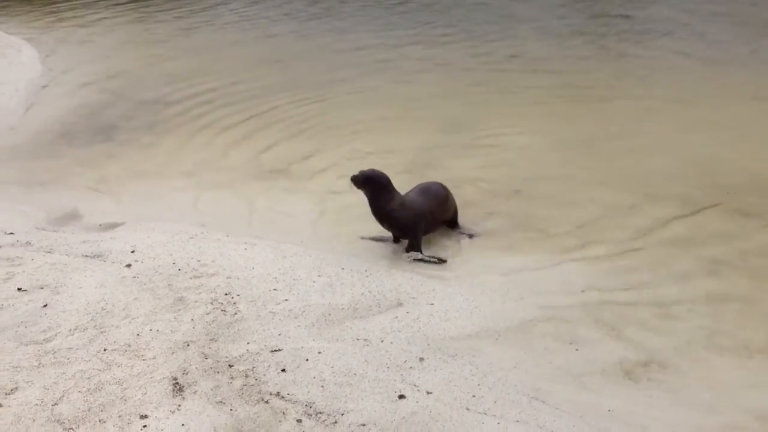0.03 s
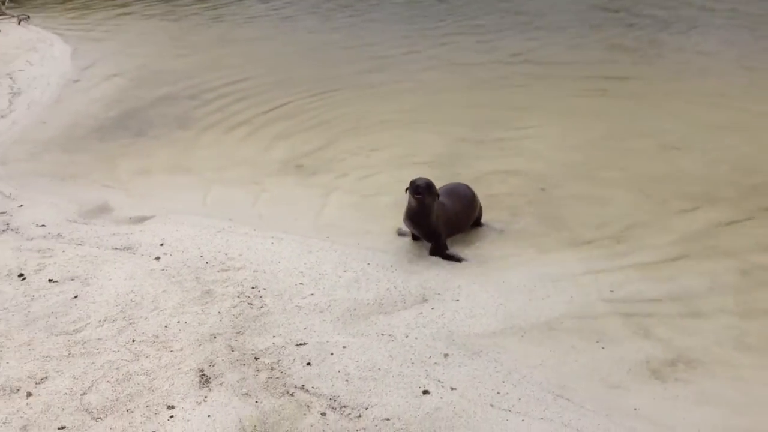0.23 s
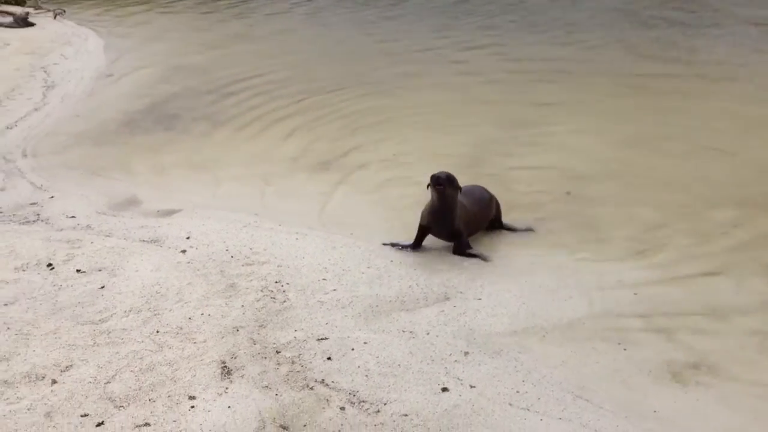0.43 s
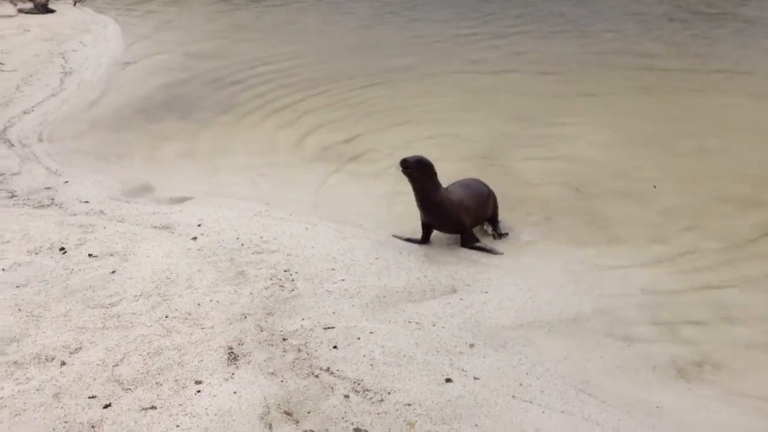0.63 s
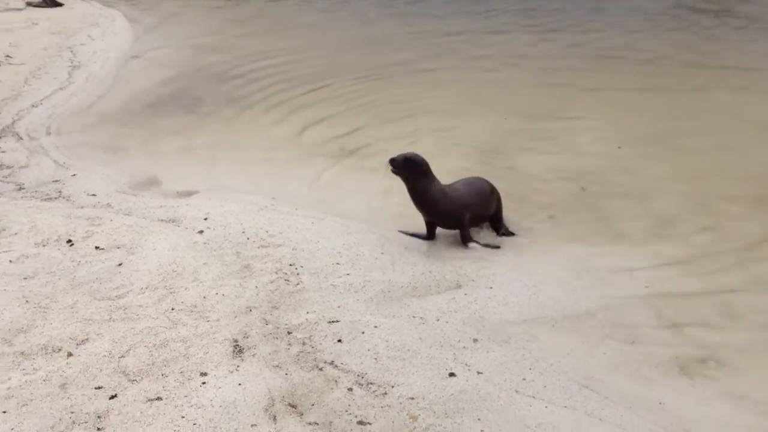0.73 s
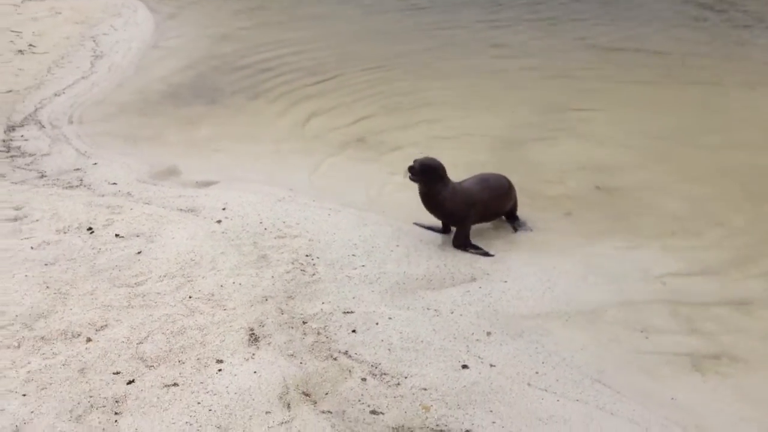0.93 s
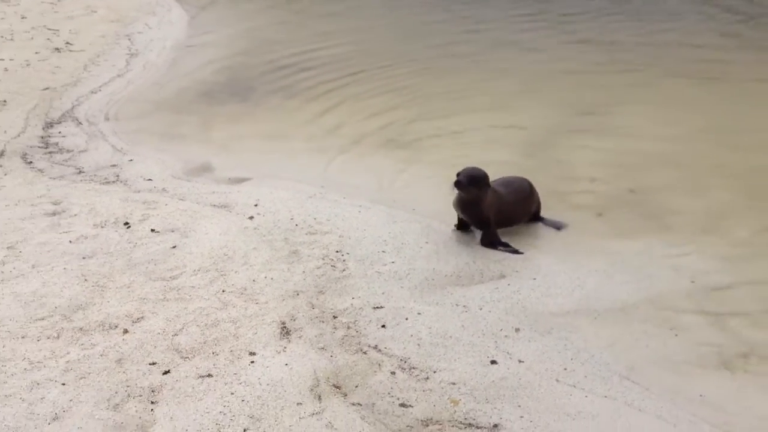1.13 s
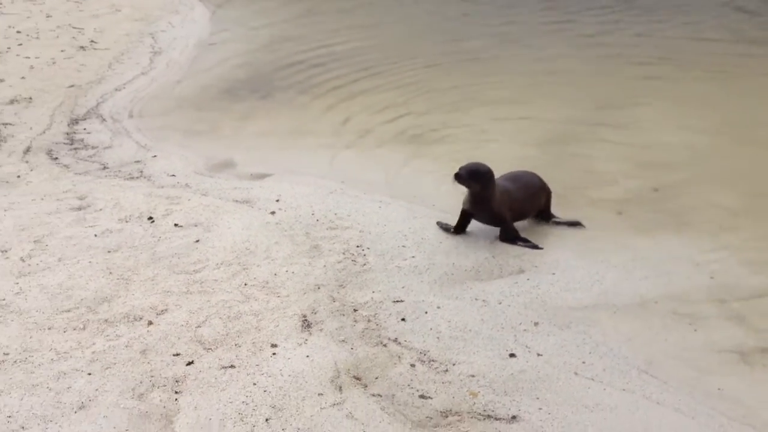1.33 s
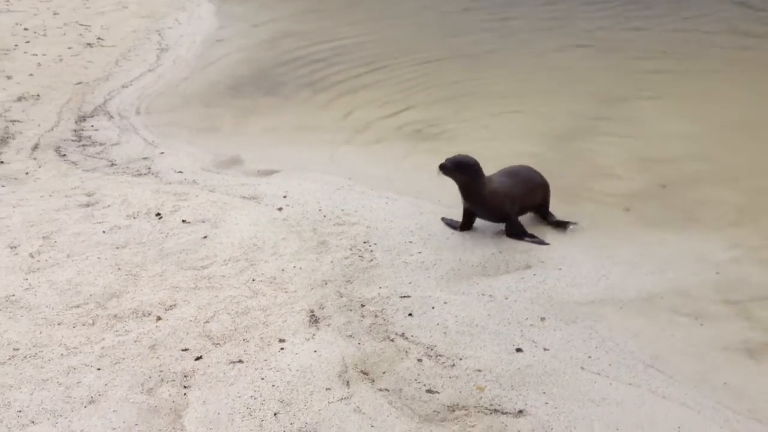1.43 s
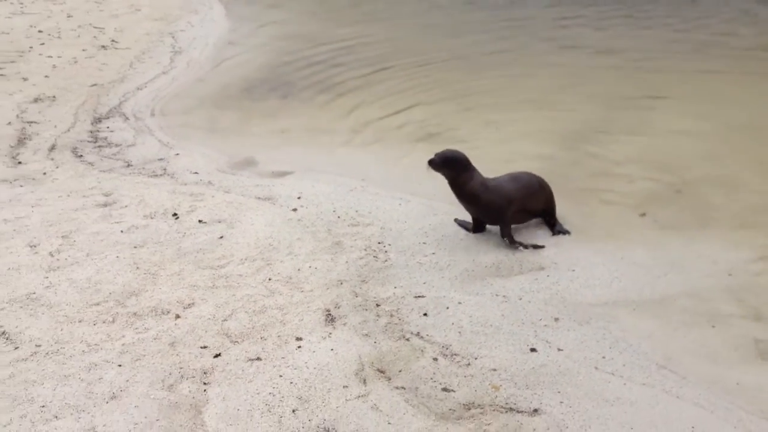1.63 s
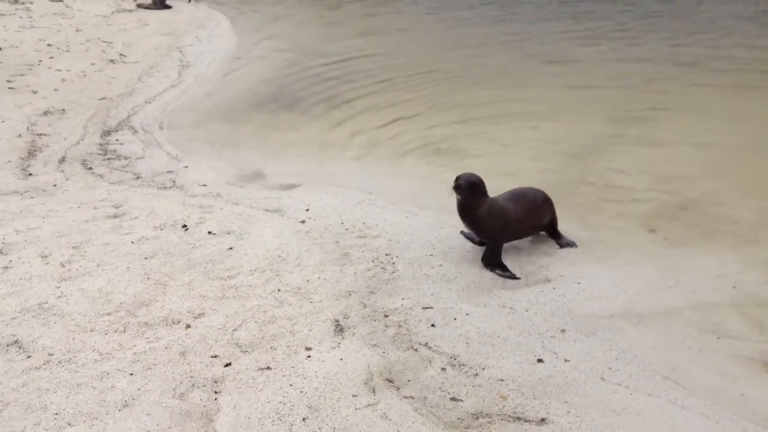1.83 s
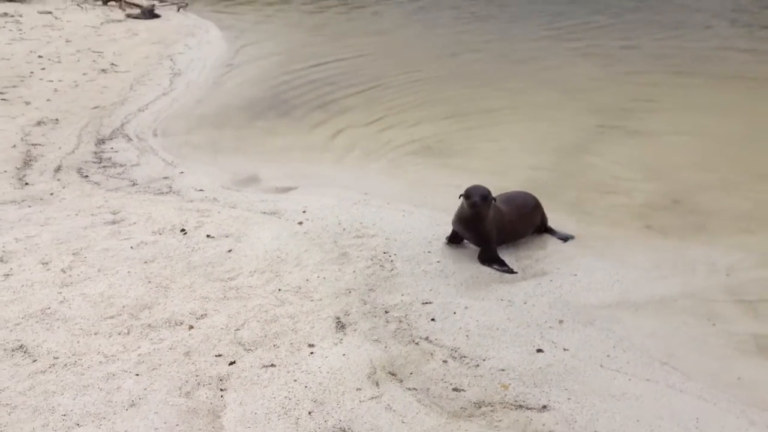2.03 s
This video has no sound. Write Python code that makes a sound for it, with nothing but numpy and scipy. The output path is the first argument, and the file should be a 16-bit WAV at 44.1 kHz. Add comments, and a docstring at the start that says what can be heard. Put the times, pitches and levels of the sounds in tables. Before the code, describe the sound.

A sea lion pup gives one harsh, raspy bleat at the edge of calm shallow water

```python
"""At the edge of a calm beach, close to a sea lion pup, one bleat is heard: a clean buzz that breaks into a rasp,
joined by a high tone that slides down at the end, with a short squeak at the start and a soft low moan under it.
Pulses and puffs of breath pass a moving throat of resonances; squeak, moan and part of the high tone are sines.
Surf rumbles far off and shallow water washes around the flippers, both of coloured noise; drips and small
bubbles are short rings of rising pitch. The call bounces off wet sand and leaves a short echo."""
import sys
import numpy as np
from scipy import signal
from scipy.fft import rfft, irfft
from scipy.io import wavfile
from scipy.ndimage import uniform_filter1d, map_coordinates

SR = 44100
rng = np.random.default_rng(int(sys.argv[2]) if len(sys.argv) > 2 else 0)


def digitize_waveform(pressure):
    """Quantize a signal to 16-bit integers and store it at the path in sys.argv[1].

    Rows of a 2-D input are taken as channels; values are limited to [-1, 1].
    """
    field = np.atleast_2d(pressure).T
    bounded = np.clip(field, -1, 1)
    quanta = np.round(bounded * 32767).astype(np.int16)
    wavfile.write(sys.argv[1], SR, quanta)


def boost(x):
    """Linear amplitude factor 10**(x/20) for a level x in decibels (scalar or array-like)."""
    u = np.asarray(x, float) / 20
    return 10 ** u


N = 92610  # samples, 2.1 s


def unit(x):
    """Scaled to rms 1."""
    return x / np.sqrt(np.mean(x ** 2) + 1e-20)


def curves(rows):
    """One value per sample for each column after the time."""
    s, *cols = np.transpose(rows)
    return np.array([np.interp(np.arange(N) / SR, s, c) for c in cols])


def fade(rows):
    """1 inside the table's time span, 0 outside, with 10 ms edges."""
    t = np.arange(N) / SR
    return np.clip(np.minimum(t - rows[0][0], rows[-1][0] - t) / .01, 0, 1)


def wobble(rate):
    """A smooth random curve with rate knots a second."""
    knots = rng.standard_normal(int(N * rate / SR) + 4)
    return map_coordinates(knots, [np.arange(N) * rate / SR])


def rush(colour, patchy_db):
    """Rushing water: coloured noise of rms 1 whose gain varies in patches of time and pitch."""
    noise = rng.standard_normal(N + 2048)
    hz, _, z = signal.stft(noise, SR, nperseg=2048, noverlap=1792)
    patches = uniform_filter1d(uniform_filter1d(rng.standard_normal(z.shape), 14, 0), 8, 1)
    f, db = np.transpose(colour)
    colour_db = np.interp(np.log(hz + 1), np.log(f + 1), db)
    gain_db = colour_db[:, None] + patchy_db * unit(patches)
    return unit(signal.istft(z * boost(gain_db), SR, nperseg=2048, noverlap=1792)[1][:N])


def drops(rows, cycles, splat_db):
    """Each row (s, dB, Hz) is a bubble that rings down over some cycles, rising in pitch, with a noisy splat."""
    out, t = np.zeros(N + SR), np.arange(SR // 20) / SR
    for s, db, hz in rows:
        age = t * hz / cycles  # in decay times
        phase = 2 * np.pi * hz * t * (1 + .01 * age)
        ring = np.sin(phase) * np.exp(-age) * (1 - np.exp(-t * hz))
        splat = boost(splat_db) * np.exp(-t / .005) * rng.standard_normal(len(t))  # dies over 5 ms
        out[round(s * SR):][:len(t)] += boost(db) * (ring + splat)
    return out[:N]


def pulses(hz, scatter):
    """One sharp pulse a cycle, rms near 1, with scattered time and size; also the running cycle count."""
    cycles = np.cumsum(hz) / SR
    at = np.interp(np.arange(1, int(cycles[-1])), cycles, np.arange(N))
    i, luck = at.astype(int), rng.standard_normal((len(at), 2))
    at = np.clip(at + luck[:, 0] * np.abs(scatter[i]) * SR / hz[i], 8, N - 10)
    size_db = luck[:, 1] * .7 * (-1.5 + 10 * np.abs(scatter[i]))
    size = np.sqrt(SR / hz[i]) * boost(size_db)
    # windowed sinc, so that a pulse may fall between samples
    taps = at.astype(int)[:, None] + np.arange(-7, 9)
    d = taps - at[:, None]
    shape = size[:, None] * np.sinc(d) * np.cos(np.pi * d / 16) ** 2
    return np.bincount(taps.ravel(), shape.ravel(), N), cycles


def resonate(x, hz, width_hz):
    """A causal resonance applied twice (soft start, dark flanks) whose centre may move."""
    turn = np.exp(2j * np.pi * np.cumsum(hz * np.ones(N)) / SR)
    pole = np.exp(-np.pi * width_hz / SR)
    slow = signal.lfilter([(1 - pole) ** 2], [1, -2 * pole, pole ** 2], x / turn)
    return 2 * np.imag(turn * slow)


def pure(rows):
    """A soft, nearly pure tone that wavers a little in pitch and level."""
    hz, db = curves(rows)
    sine = np.sin(2 * np.pi * np.cumsum(hz + 4 * wobble(39.1)) / SR)
    return fade(rows) * boost(db + 0.42 * wobble(31.7)) * np.sqrt(2) * sine


def far_surf():
    """Surf far off: a low rumble of noise that swells slowly and trembles slightly."""
    # Each row: time in seconds, level in dB.
    swell = [(0, -48), (1.1, -44.5), (1.5, -44.5), (1.85, -43.5), (2.1, -43.5)]
    # Each row: frequency in Hz, relative level per Hz in dB.
    surf_colour = [(25, -67), (48, -42.5), (162, 0), (404, -4.5), (631, -15), (1240, -20), (1540, -20.5),
                   (2160, -24), (2910, -27), (4000, -46.5), (5200, -62), (8800, -120)]
    level_db = curves(swell)[0] + 0.17 * wobble(6.9) + 0.38 * wobble(34.67)
    return boost(level_db) * rush(surf_colour, patchy_db=1.5)


def near_wash():
    """Shallow water close by: a bright hiss of noise that comes and goes."""
    # Each row: time in seconds, level in dB.
    lapping = [(0, -64.5), (.11, -60), (1, -42), (1.07, -48.5), (1.14, -57), (1.27, -61), (1.36, -52),
               (1.53, -54.5), (1.6, -61), (1.68, -59.5), (1.7, -52.5), (1.72, -55), (1.76, -51.5),
               (1.83, -60.5), (1.94, -61), (2.01, -57), (2.1, -64.5)]
    # Each row: frequency in Hz, relative level per Hz in dB.
    wash_colour = [(1800, -10), (3000, 1.5), (4300, -4), (8300, -1), (10300, -9), (14100, -6.5),
                   (15600, -13)]
    return boost(curves(lapping)[0] + .8 * wobble(14)) * rush(wash_colour, patchy_db=1.5)


def fizz():
    """Small bubbles at random times, 330 a second, most of them faint, ringing only briefly."""
    luck = rng.random((int(330 * N / SR), 3))
    start_s = luck[:, 0] * N / SR
    level_db = -50 - 3 * np.log(luck[:, 1] + .03)
    pitch_hz = 3500 * 3.5 ** (2 * luck[:, 2] - 1)
    return drops(np.c_[start_s, level_db, pitch_hz], cycles=2.37, splat_db=-26)


def drips():
    """Single drips close by: each shuts in a bubble that rings longer than the fizz."""
    # Each row: start in seconds, level in dB, starting pitch in Hz.
    single_drips = [(.016, -45.5, 854), (.092, -36.5, 2640), (.096, -41.5, 960), (1.152, -31.5, 2010),
                    (1.178, -38, 2360), (1.244, -46.5, 4100), (1.505, -46, 2930), (1.526, -44, 2700),
                    (1.688, -43.5, 2380), (1.698, -47, 3970)]
    return drops(single_drips, cycles=7.7, splat_db=-16)


def low_moan():
    """A low moan under the bleat: one wavering sine."""
    # Each row: time in seconds, pitch in Hz, level in dB.
    moan_path = [(.42, 251, -47.5), (.548, 277.6, -42.5), (.588, 277.4, -33.5), (.678, 283.3, -39),
                 (.694, 258, -49), (.736, 283.8, -43), (.834, 257.4, -45.5), (.93, 229.4, -43.5)]
    return pure(moan_path)


def squeak():
    """A squeak as the mouth opens: one wavering sine, gliding up."""
    # Each row: time in seconds, pitch in Hz, level in dB.
    squeak_path = [(.186, 1398, -52), (.216, 1734, -37)]
    return pure(squeak_path)


def vocal_folds():
    """Fold pulses give way to puffs of breath noise as the voice goes hoarse; also the share of breath."""
    # Vocal folds. Each row: time in seconds, pitch in Hz, level ahead of the throat in dB.
    fold_path = [(.176, 198.5, -80), (.184, 204.3, -90), (.189, 202, -42), (.215, 199.8, -43),
                 (.252, 186.3, -37.5), (.308, 193, -37.5), (.37, 196.8, -35), (.406, 206.7, -35),
                 (.43, 203, -35), (.526, 212.7, -34), (.61, 216.5, -33.5), (.632, 223.2, -27.5),
                 (.7, 226.6, -30), (.77, 223.4, -35), (.855, 220.5, -36.5), (.87, 221.1, -32.5),
                 (.895, 217.4, -36), (.945, 217.1, -29.5), (.965, 215.6, -31.5), (.99, 196.6, -41),
                 (1.005, 193, -37.5), (1.048, 209.7, -40.5), (1.085, 209, -53)]
    # Hoarseness. Each row: time in seconds, share of breath from 0 to 1, timing scatter in cycles.
    hoarseness = [(.19, .12, .003), (.39, .1, .003), (.405, .25, .006), (.425, .12, .003), (.61, .11, .003),
                  (.625, .36, .004), (.8, .65, .04), (.97, .8, .1), (.99, 1, .1)]
    (hz, level_db), (breath, scatter) = curves(fold_path), curves(hoarseness)
    buzz, cycles = pulses(hz, scatter)
    puff_phase = 2 * np.pi * (cycles + 0.41 * wobble(60))
    puffs = unit(np.exp(1.2 * np.cos(puff_phase)) * rng.standard_normal(N))
    mix = np.sqrt(1 - breath) * buzz + np.sqrt(breath) * puffs
    rasp_db = 1.3 * breath * wobble(110)
    return fade(fold_path) * boost(level_db) * mix * boost(rasp_db), breath


def high_tone():
    """A pulse train rich in overtones for the throat, and a direct part of fundamental and third partial."""
    # Each row: time in seconds, pitch in Hz, level of the fundamental in dB.
    tone_path = [(.62, 700.2, -52), (.658, 749.5, -34), (.684, 744, -29.5), (.702, 776, -43),
                 (.715, 768.6, -35.5), (.744, 739.4, -37.5), (.768, 769, -45), (.782, 767.6, -34),
                 (.805, 769, -55), (.832, 768.4, -37), (.856, 777, -49), (.868, 755.8, -34),
                 (.892, 768, -32.5), (.938, 782.3, -37), (.954, 760.4, -35.5), (.966, 664, -42.5),
                 (.99, 521.4, -30), (1.002, 459.9, -32.5), (1.048, 390.8, -37), (1.076, 379, -46.5),
                 (1.1, 380, -82)]
    # Overtones. Each row: time in seconds, level of the pulse train ahead of the throat in dB.
    overtone_path = [(.953, -51.5), (.965, -31), (.985, -42), (1.003, -32), (1.048, -32.5), (1.075, -75)]
    (hz, level_db), (over_db,) = curves(tone_path), curves(overtone_path)
    edge, turns = pulses(hz + 6 * wobble(70), np.full(N, .009))  # scatter in cycles
    fundamental = boost(level_db) * np.sin(2 * np.pi * turns)
    third = fade(overtone_path) * boost(over_db - 2.5) * np.sin(3 * 2 * np.pi * turns)
    direct = fade(tone_path) * np.sqrt(2) * (fundamental + third)
    return fade(tone_path) * boost(over_db) * edge, direct


def lag_bass(x):
    """A pulse's bass trails its treble: 1.2 ms late at the bottom, shrinking to nothing at 9 kHz."""
    lag_s, end_hz = .0012, 9000
    f = np.minimum(np.fft.rfftfreq(N, 1 / SR), end_hz)
    return irfft(rfft(x) * np.exp(-2j * np.pi * lag_s * f * (1 - f / (2 * end_hz))), N)


def throat(source, breath):
    """Parallel resonances: seven lower ones that move, five upper ones that breath opens, three that stay put."""
    # Each row: time in seconds, then the centres of the seven lower resonances in Hz.
    lower_path = [(.2, 895, 1530, 2820, 3960, 5170, 6330, 7430),
                  (.27, 967, 1950, 3350, 4080, 5620, 6500, 7370),
                  (.37, 825, 1650, 3080, 4000, 5480, 6600, 7300),
                  (.47, 770, 1660, 3080, 3890, 5220, 6320, 7560),
                  (.58, 799.6, 1728, 3044, 3720, 4930, 6030, 7370),
                  (.67, 855, 1766, 3174, 3890, 4980, 6080, 7290),
                  (.84, 867, 1810, 3188, 3910, 5560, 6740, 7646),
                  (.96, 880, 1900, 3290, 4050, 5440, 6680, 7430),
                  (1.01, 870, 1870, 3500, 4330, 5630, 7000, 7530)]
    # Each row: time in seconds, gains of those seven in dB, shared gain of the upper ones in dB.
    gain_path = [(.2, 3, 1, 3, -1, -6.5, -6, 1.5, -24), (.27, 4, -2, 2.5, 3, 0.5, -10, -3.5, -31),
                 (.37, 5.5, -1, 1, 6.5, 6.5, -3.5, -0.5, -29.5), (.47, 1.5, -7, 4, 0.5, 3, -1, -3.5, -31),
                 (.58, 1, -0.5, 5, 1, 0, -1, -3, -30), (.67, -1, 2, 8.5, -7.5, -9, -2, -2.5, -29),
                 (.84, 5, -4.5, 3, 1.5, -8.5, -2, -5.5, -34),
                 (.96, 1, -1.5, -0.5, 0.5, -7.5, -3.5, -8.5, -32),
                 (1.01, 9, -0.5, 1, 0.5, -12, -19, -10, -32.5)]
    # Upper resonances. Each row: centre in Hz, gain in dB on top of the shared gain.
    upper = [(8500, 10.5), (9700, 4.5), (11000, 9), (12400, -4), (14200, -0.5)]
    # Widths of the seven lower resonances, in Hz for one pass of the filter.
    lower_widths = [220, 350, 190, 420, 520, 500, 520]
    # Broad fixed resonances. Each row: centre in Hz, width in Hz for one pass, gain in dB.
    still = [(487, 300, -10), (1472, 495, -1.5), (2643, 550, -7)]
    # Sign of each resonance, 1 or -1; neighbours of like sign leave a notch between them.
    polarity = [1, -1, -1, 1, 1, -1, 1, 1, -1, 1, -1, 1, -1, -1, 1]
    *lower_db, upper_db = curves(gain_path)
    upper_db = upper_db + 9.5 * breath
    centres = [*curves(lower_path), *[hz for hz, _ in upper], *[hz for hz, _, _ in still]]
    widths = [*lower_widths, *[800] * len(upper), *[width for _, width, _ in still]]
    gains = [*lower_db, *[upper_db + db for _, db in upper], *[db for _, _, db in still]]
    voiced = np.zeros(N)
    for sign, gain_db, hz, width_hz in zip(polarity, gains, centres, widths):
        trembling = boost(gain_db + 1.2 * wobble(30.13))
        voiced += sign * trembling * resonate(source, hz, width_hz)
    return -boost(9.5) * voiced


def bleat():
    """Fold pulses, puffs of breath and the high tone's overtones pass one moving throat."""
    folds, breath = vocal_folds()
    overtones, direct = high_tone()
    return throat(lag_bass(folds + overtones), breath) + direct


def shore_answer(call):
    """A bounce off the wet sand 2.7 ms late, and an echo of decaying noise that falls 60 dB in 0.1 s."""
    t = np.arange(SR // 4) / SR
    tail = rng.standard_normal(len(t)) * boost(-60 * t / .1)
    echo = signal.fftconvolve(call, tail / np.linalg.norm(tail))[:N]
    return boost(-11) * np.roll(call, round(.0027 * SR)) + boost(-16) * echo


def scene():
    """The water, and the pup's call with its short answer from the shore."""
    water = far_surf() + near_wash() + fizz() + drips()
    call = low_moan() + squeak() + bleat()
    return (water + call + shore_answer(call))[None]


def top_cut(x):
    """Nothing passes above the cut-off."""
    return signal.sosfilt(signal.butter(12, 15400, fs=SR, output="sos"), x)


def record(dry):
    """The small microphone loses the deep bass, below about 59 Hz."""
    high_pass = signal.butter(3, 59.4, "high", fs=SR, output="sos")
    thin = signal.sosfilt(high_pass, dry)
    return top_cut(thin)


dry = scene()
out = record(dry)
digitize_waveform(out)
```